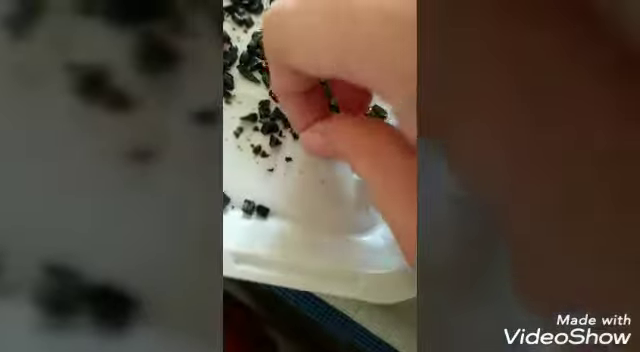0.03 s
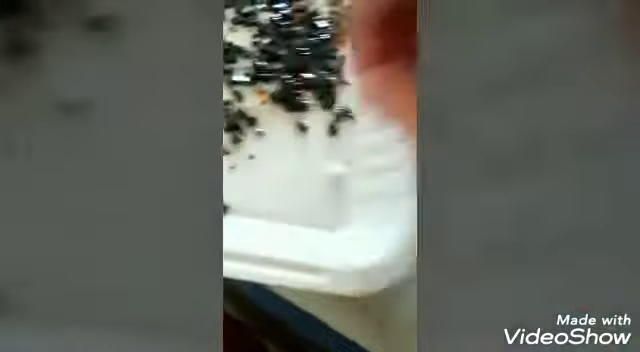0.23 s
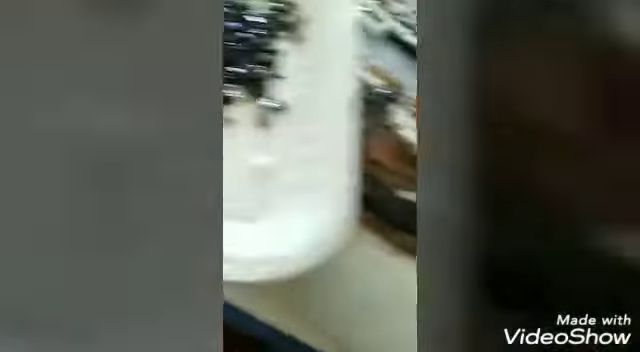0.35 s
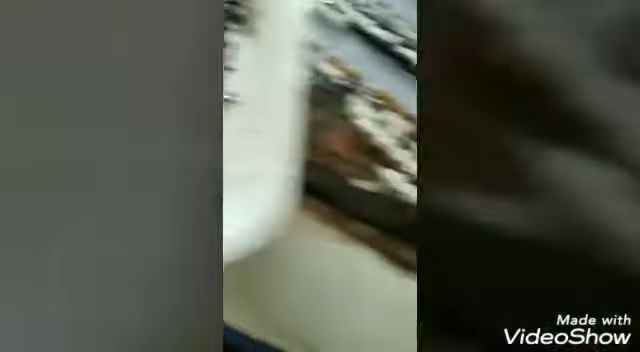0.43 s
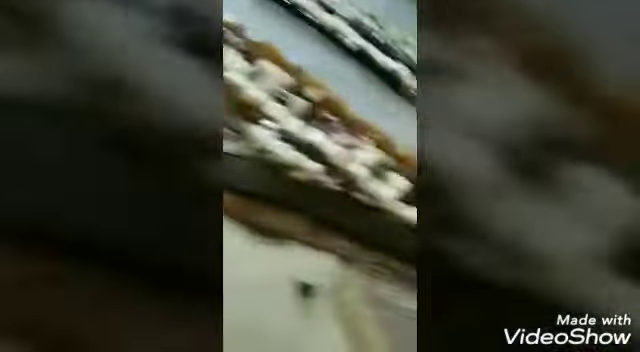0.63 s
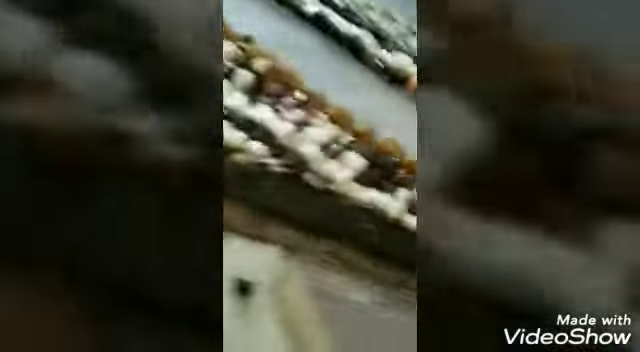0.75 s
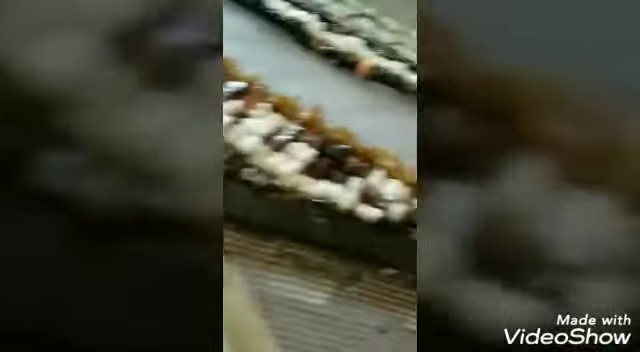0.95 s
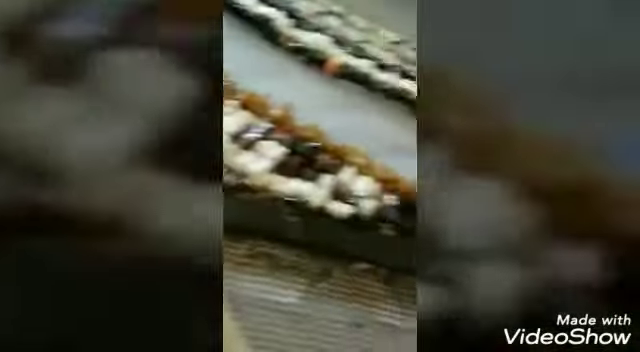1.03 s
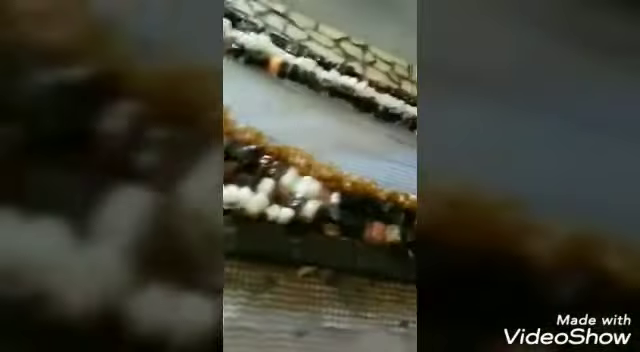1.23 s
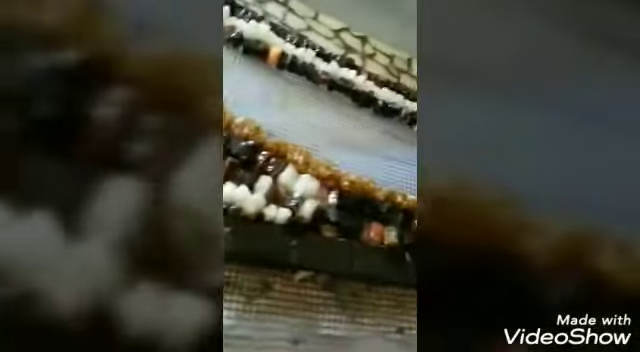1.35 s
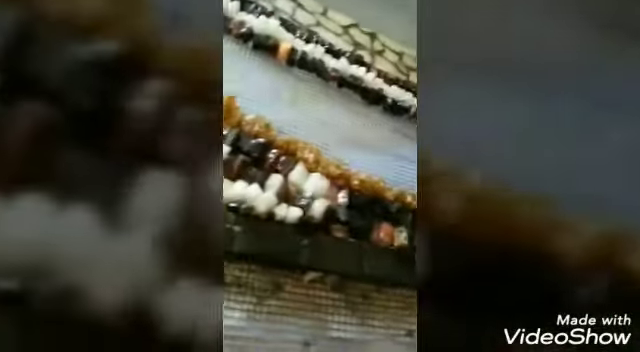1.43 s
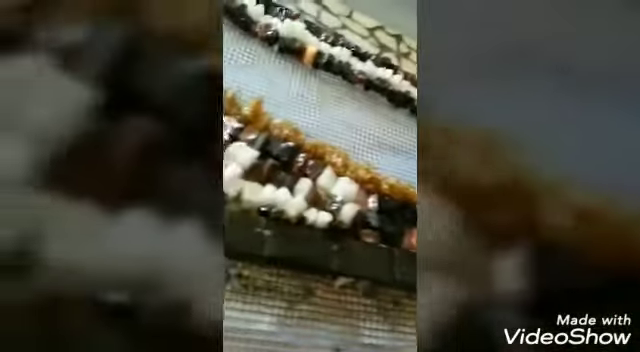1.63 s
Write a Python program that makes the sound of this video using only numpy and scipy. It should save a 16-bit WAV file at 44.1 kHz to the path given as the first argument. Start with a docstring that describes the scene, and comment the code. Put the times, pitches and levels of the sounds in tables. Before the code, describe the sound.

Small hard chips clatter onto a plastic tray, close and toward the right. After one faint tick, the bright rattle starts at about 0.2 seconds, peaks at 0.3 and settles by 0.5 with a short room echo. Then a hand faintly rubs and bumps the microphone until 1.7 seconds, with a dull knock near 0.75. A very faint low hollow tone swells between 0.5 and 1 second.

```python
"""A pinch of small hard chips dropped onto a plastic tray of chips, in a small room.
The microphone is a hand-held phone, its right port close to the tray; the left port hears mostly room.
Each chip cracks, pings, rattles its neighbours and rings the tray briefly. The moving hand rubs and
bumps the phone, and a low hollow note swells now and then over faint room tone."""
import sys
import numpy as np
from scipy import signal
from scipy.fft import rfft, irfft
from scipy.io import wavfile
from scipy.ndimage import uniform_filter1d

SR = 44100
rng = np.random.default_rng(int(sys.argv[2]) if len(sys.argv) > 2 else 0)


def master(y):
    """Save y as 16-bit WAV."""
    cut = np.clip(np.atleast_2d(y).T, -1, 1)
    pcm = np.round(cut * 32767)  # scale
    wavfile.write(sys.argv[1], SR, pcm.astype(np.int16))


N = 74970


def chip(ring_db, ping_db, size=4096, ping_hz=7110, ping_rise_s=0.00023):
    """One chip lands: a crack, its own ping, rattling neighbours, and tray modes set by where it hits."""
    # modes of the plastic tray: pitch_hz, relative_db, t60_s
    tray_modes = [(1452, -2, 0.053), (1620, -3.5, 0.018), (1750, -1.5, 0.02), (2052, -5, 0.079),
                  (2304, 6, .018), (2484, -5, 0.021), (2870, -3, 0.0065), (3514, 1, 0.022),
                  (5420, -3.5, 0.043), (5950, -8, 0.042), (6554, -2, 0.087), (6600, -18, 0.044),
                  (7600, -6.5, 0.042), (7676, -12, 0.044)]
    t = np.arange(size) / SR
    hz, db, t60 = np.array(tray_modes).T[:, :, None]
    place, detune = rng.standard_normal((2, len(tray_modes), 1))
    modes = np.sin(2 * np.pi * hz * (1 + 0.0097 * detune) * t) * fade(t, t60)
    ring = unit(np.sum(place * undb(db) * modes, axis=0))
    crack = unit(rng.standard_normal(size) * t * fade(t, t60=0.0084))
    rattle = unit(rng.standard_normal(size) * fade(t, t60=0.026))
    pitch_hz = ping_hz * (1 + 0.055 * rng.standard_normal())
    ping = unit(np.sin(2 * np.pi * pitch_hz * t) * t * np.exp(-t / ping_rise_s))
    return crack + undb(ping_db - 8) * ping + undb(-3.5) * rattle + undb(ring_db - 4.5) * ring


def falling_chips(count=110):
    """A few chips strike clearly within a shower of lesser ones that swells fast and settles."""
    # clearest impacts, all levels relative: start_s, level_db, tray_ring_db, chip_ping_db
    impacts = [(.0500, -29, -11, 5.5), (.2358, -14.5, 3.5, -9), (.2395, -22, 6, 12), (.2464, -10, -4, 4.5),
               (.2495, -9, 0.5, 2.5), (.2578, -9, -17, 8), (.2606, -6, 0, -3), (.2672, -19, -17, 1),
               (.2797, -12.5, 5, 0), (.2812, -4.5, 0, -8), (.2839, -3, -9, -3), (.2851, -2, -0.5, -9),
               (.2875, -4, 3, -1), (.2970, -1.5, -0.5, 3), (.3006, 2.5, -20, -1), (.3036, 1.5, 3.5, 3),
               (.3056, -0.5, -1, 3), (.3074, 3.5, -6.5, -0.5), (.3096, 2.5, -7, -1.5),
               (.3148, -2.5, -13.5, -11), (.3325, -7, 8.5, 1), (.3341, -5, 3.5, -21), (0.3681, -17, -6, -2),
               (.3814, -20, -3, 17.5), (.3963, -32, -20, 4), (.4141, -27, -4, 7), (.4598, -25.5, 7.5, 4),
               (.4722, -29, -5, 7)]
    start_s, peak_s, end_s = 0.238, 0.293, 0.49
    swell_db_per_s, settle_db_per_s = 172, 185
    out = np.zeros(N)
    for at, db, ring_db, ping_db in impacts:
        add(out, at, undb(db) * chip(ring_db, ping_db))
    for k in range(count):
        at = start_s + (end_s - start_s) * (k + rng.random()) / count
        below_peak_db = max(swell_db_per_s * (peak_s - at), settle_db_per_s * (at - peak_s))
        db = -5 - below_peak_db + 2 * rng.standard_normal()
        add(out, at, undb(db) * chip(ring_db=-15.5, ping_db=-5.5))
    return undb(-5.5) * out


def rustle(t):
    """Chips stirred by the fingers slide over each other with a faint, grainy hiss."""
    # stirs of the chips: centre_s, level_db, half_length_s
    stirs = [(0.05, -63, .022), (0.244, -56, 0.037)]
    grain = undb(3 * walk(rate_hz=570))
    return swells(t, stirs) * grain * rng.standard_normal(N)


def direct_sound(clatter):
    """The clatter arrives full at the near right port and weak at the shaded left one."""
    # tone of the direct path to each port: frequency_hz, gain_db
    shaded_tone = [(150, -10), (400, -9), (800, -8.5), (1500, -8), (2600, 3), (4500, 4), (6500, -2.5),
                   (9000, -6), (13000, -29)]
    near_tone = [(40, -30), (130, 0.5), (300, -6.5), (700, -3), (1100, -2.5), (1600, 4.5), (2100, 3.5),
                 (2800, 2.5), (4500, 0), (6000, 2.5), (7000, 0), (9000, 1), (14000, -5.5)]
    return np.array([undb(-15.5) * colour(clatter, shaded_tone), colour(clatter, near_tone)])


def room(clatter, treble_hz=8500, build_s=0.0027):
    """The small room's diffuse tail, unrelated at the two ports; the treble dies slightly sooner."""
    # tone of the room at each port: frequency_hz, gain_db
    left_tone = [(150, -23), (400, -6.5), (900, -10.5), (1500, 1), (3000, 1), (6000, -2), (9000, -13.5),
                 (13000, -18.5)]
    right_tone = [(150, -22), (400, 0), (900, -5.5), (1500, 0), (3000, 1.5), (6000, -4), (9000, -6),
                  (13000, -20)]
    t = np.arange(N) / SR
    echoes = rng.standard_normal((2, N))
    low = signal.sosfiltfilt(signal.butter(2, treble_hz, fs=SR, output="sos"), echoes)
    decay = low * fade(t, t60=0.45) + (echoes - low) * fade(t, t60=0.43)
    tail = unit(decay * (1 - np.exp(-t / build_s)))
    left, right = signal.fftconvolve(clatter[None], tail, axes=1)[:, :N]
    return undb(-9.5) * np.array([colour(left, left_tone), colour(right, right_tone)])


def finger_bumps(t, case_hz=100.4, roughness=0.64):
    """Fingers bump the phone by the right port: a short, dull swing of the case and a drag of skin."""
    # soft bumps on the case: start_s, relative_db, length_s
    touches = [(0.139, -46, 0.027), (0.181, -38.5, 0.017), (.228, -38.5, 0.0067), (.370, -47.5, 0.023),
               (.485, -54, 0.011), (0.525, -45, 0.021), (.739, -37, 0.01), (0.758, -29.5, 0.013),
               (1.015, -48.5, 0.024), (1.125, -44.5, 0.018), (1.169, -36.5, 0.014), (1.226, -40, 0.027),
               (1.33, -44, 0.021), (1.364, -42, 0.019), (1.438, -40, 0.031), (1.489, -40, 0.05),
               (1.538, -39.5, 0.033), (1.625, -42, 0.027), (1.659, -41.5, 0.033)]
    # spectrum of the dragging skin: frequency_hz, gain_db
    skin_tone = [(20, -25), (50, 3), (95, -4), (140, -0.5), (200, -8.5), (500, -20.5), (1500, -40),
                 (5000, -78)]
    out = np.zeros(N)
    for at, db, length in touches:
        push = t * np.exp(-2 * (t / length) ** 2)
        pitch_hz = case_hz * undb(1.27 * rng.standard_normal())  # scatters by about 15 %
        swing = unit(np.sin(2 * np.pi * pitch_hz * t) * push)
        drag = unit(colour(push * rng.standard_normal(N), skin_tone))
        add(out, at, undb(db - 3) * np.sqrt(length * SR) * unit(swing + roughness * drag))
    return np.array([undb(-27.5) * out, out])


def hand_rubbing(t):
    """Skin drags unevenly over the case, catching at each port on its own, and once scrapes it."""
    # strength of the rubbing: time_s, relative_db
    strength = [(0, -61.5), (.118, -62), (.15, -50), (.278, -50), (.30, -47.5), (.434, -54.5),
                (.548, -48.5), (.58, -56.5), (.642, -71), (.656, -54.5), (.728, -55.5), (.742, -51),
                (.898, -52.5), (.956, -56), (1.018, -54), (1.15, -55), (1.174, -48), (1.21, -53.5),
                (1.243, -48), (1.285, -54), (1.37, -51.5), (1.428, -58), (1.448, -49), (1.60, -51.5),
                (1.7, -51.5)]
    # one faint scrape as the hand moves on: centre_s, relative_db, half_length_s
    scrapes = [(0.895, -50.5, 0.019)]
    # spectra of the rub through the case, the rub at each port, and the scrape: frequency_hz, gain_db
    case_tone = [(40, -25), (150, -8.5), (230, 1), (330, 0.5), (480, -7.5), (700, -25.5), (1200, -20.5),
                 (4000, -51.5)]
    left_tone = [(30, -19), (150, -16.5), (340, 0.5), (600, -6), (1000, -11), (1600, -19), (3000, -24.5),
                 (3500, -34), (7000, -39.5), (14000, -46.5)]
    right_tone = [(25, -13), (50, -3), (115, 3.5), (220, -14), (450, -4.5), (780, -6), (1200, -19.5),
                  (3000, -24), (3500, -35), (8000, -36.5), (14000, -49.5)]
    scrape_tone = [(1000, -24), (2700, -4), (3300, -9), (3850, -3), (4600, -14), (12000, -25)]
    db = np.interp(t, *np.array(strength).T) + 16 + walk(rate_hz=59.55)
    at_ports = np.array([noise(tone) * undb(walk(rate_hz=90)) for tone in (left_tone, right_tone)])
    rub = undb(db) * (noise(case_tone) + at_ports)
    scrape = swells(t, scrapes) * np.array([noise(scrape_tone), noise(scrape_tone)])
    return rub + scrape


def hollow_note(t, pitch_hz=261):
    """A low, slightly wavering note swells and fades, alike at both ports."""
    # swells of the note: centre_s, level_db, half_length_s
    note_swells = [(0.51, -52, 0.071), (0.8, -53.5, 0.041), (0.879, -52, 0.054), (1.025, -57.5, 0.043)]
    wavering_hz = pitch_hz * (1 + 0.0037 * walk(rate_hz=25))
    return swells(t, note_swells) * np.sqrt(2) * np.sin(2 * np.pi * np.cumsum(wavering_hz) / SR)


def room_tone(level_db=-62.5):
    """The faint, steady hush of the still room, unrelated at the two ports."""
    # spectrum of the still room: frequency_hz, gain_db
    air_tone = [(30, -2), (130, -15.5), (280, -3), (420, -3.5), (800, -15.5), (1600, -14.5), (4000, -26),
                (9000, -30.5), (14000, -34.5)]
    return undb(level_db) * np.sqrt(N) * unit(np.array([noise(air_tone), noise(air_tone)]))


def undb(db):
    """Decibels to gain."""
    return 10 ** (np.asarray(db) / 20)


def unit(x):
    """Scale to an energy of one."""
    return x / np.sqrt(np.sum(x ** 2, axis=-1, keepdims=True))


def fade(t, t60):
    """Exponential decay, 60 dB down after t60 seconds."""
    return np.exp(-np.log(1000) * t / t60)


def colour(x, points):
    """Minimum-phase filter through (frequency_hz, gain_db) points."""
    size = 2 * N
    hz, db = np.array(points).T
    bins_hz = np.maximum(np.fft.rfftfreq(size, 1 / SR), 1)
    gain = undb(np.interp(np.log(bins_hz), np.log(hz), db))
    cepstrum = irfft(np.log(gain))
    cepstrum[1:N] *= 2  # folding onto positive time makes the filter causal
    cepstrum[N + 1:] = 0
    return irfft(rfft(x, size) * np.exp(rfft(cepstrum)))[..., :N]


def noise(points):
    """White noise coloured by (frequency_hz, gain_db) points."""
    return colour(rng.standard_normal(N), points)


def walk(rate_hz):
    """Smooth random wander with a spread of one."""
    hold = int(SR / rate_hz)
    steps = np.repeat(rng.standard_normal(N // hold + 1), hold)
    wander = uniform_filter1d(steps, hold)[:N]
    return wander / wander.std()


def swells(t, rows):
    """Bell-shaped swells from (centre_s, level_db, half_length_s) rows."""
    return sum(undb(db) * np.exp(-((t - at) / half) ** 2) for at, db, half in rows)


def add(out, at_s, x):
    """Mix x into out from a given time."""
    i = int(np.clip(at_s * SR, 0, N - 1))
    out[i:i + len(x)] += x[:N - i]


def scene():
    """Close clatter, its room tail, handling noise and background at the left and right ports."""
    t = np.arange(N) / SR
    clatter = falling_chips() + rustle(t)
    air = room_tone()
    chips_in_room = direct_sound(clatter) + room(clatter)
    handling = finger_bumps(t) + hand_rubbing(t)
    return chips_in_room + handling + hollow_note(t) + air


def record(dry):
    """The phone's microphone: the right port resonates in the treble, and both sides lose the top."""
    port_hz, port_width_hz, top_hz = 7330, 1050, 14350
    left, right = dry
    resonance = signal.lfilter(*signal.iirpeak(port_hz, port_hz / port_width_hz, fs=SR), right)
    ports = np.array([left, right + undb(4) * resonance])
    return signal.sosfilt(signal.ellip(10, 0.2, 80, top_hz, fs=SR, output="sos"), ports)


dry = scene()
out = record(dry)
master(out)
```